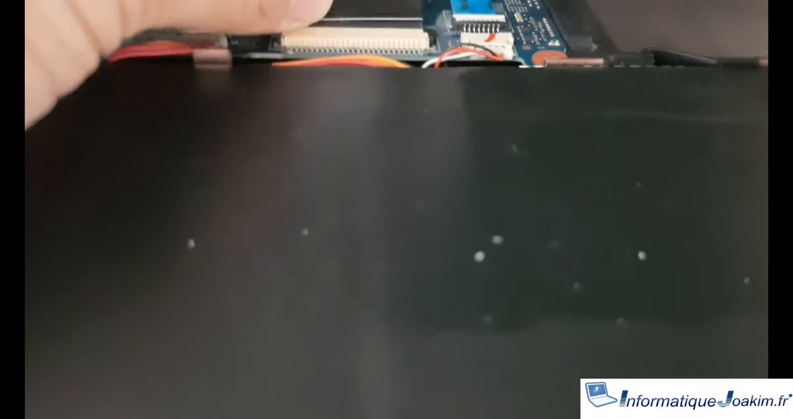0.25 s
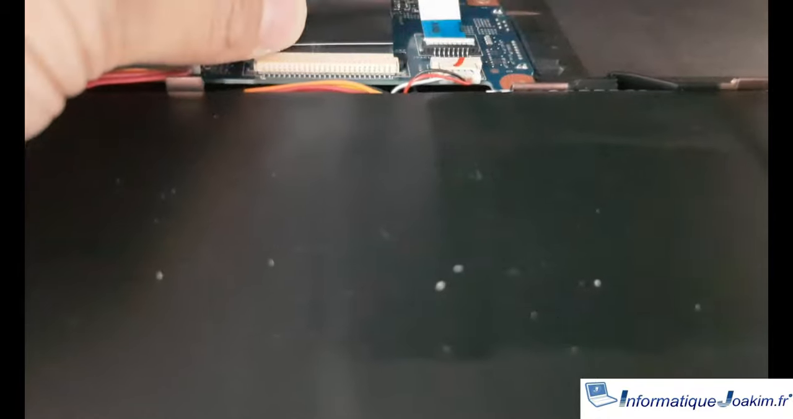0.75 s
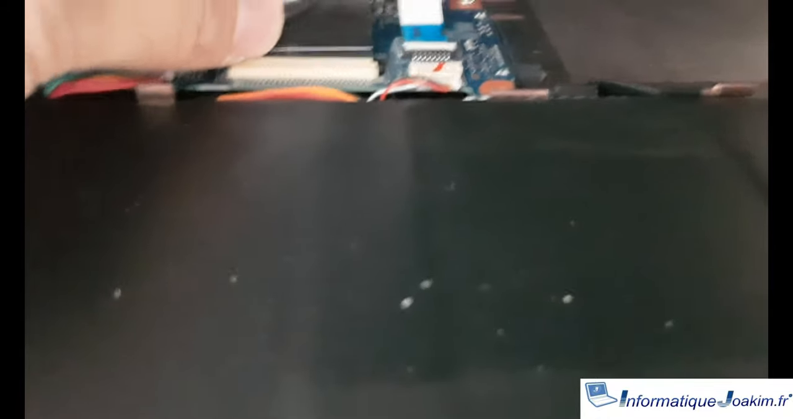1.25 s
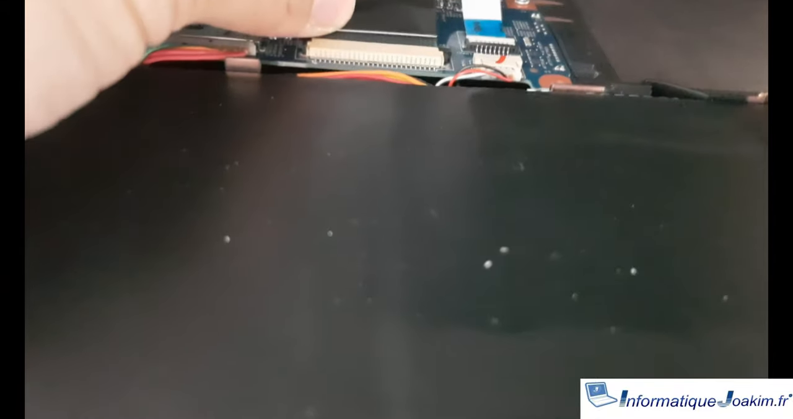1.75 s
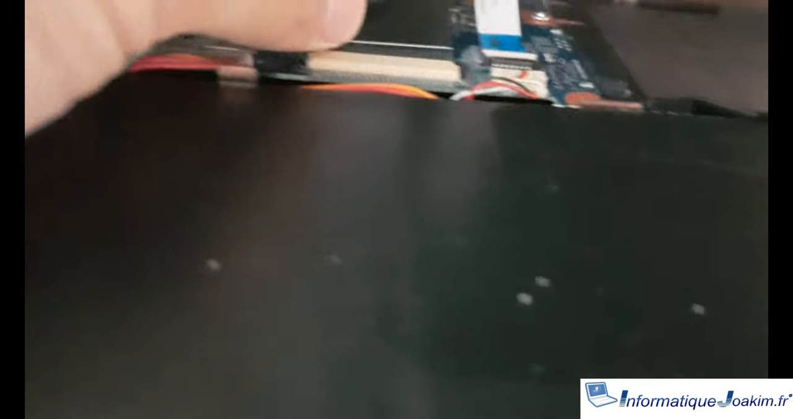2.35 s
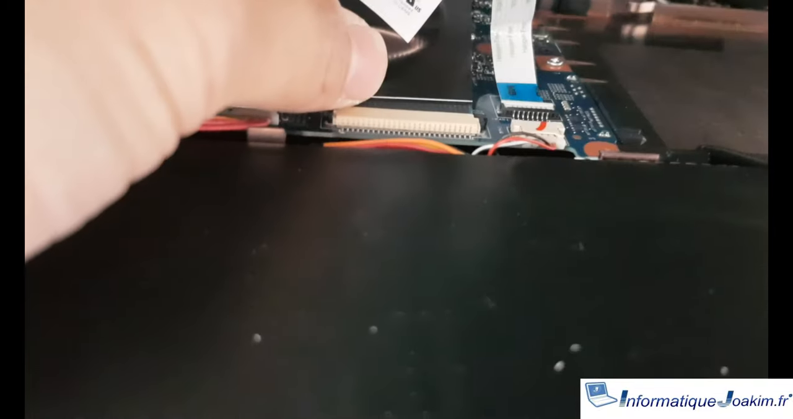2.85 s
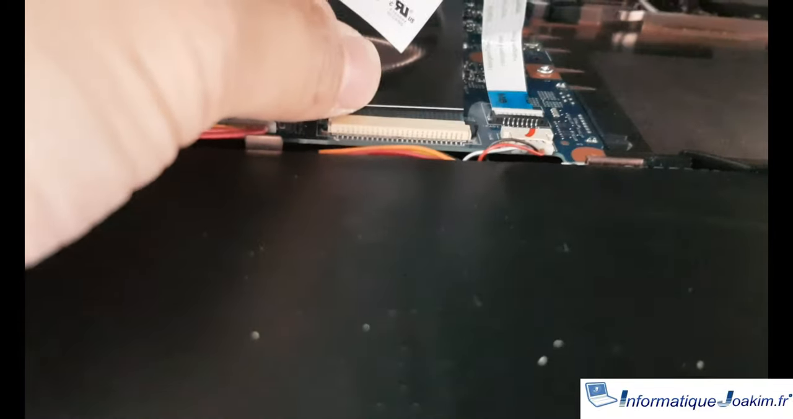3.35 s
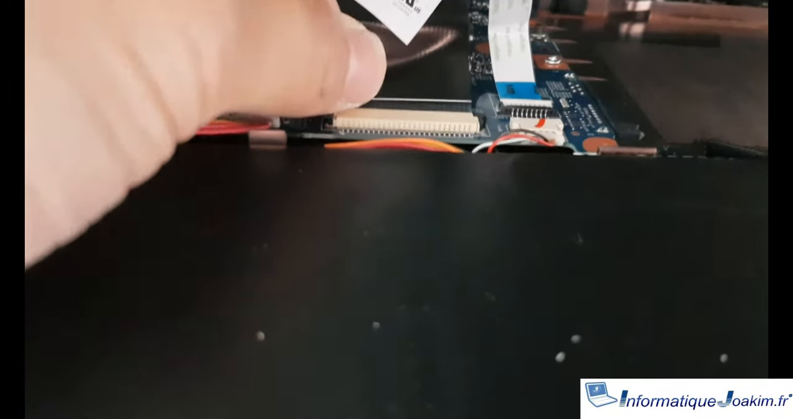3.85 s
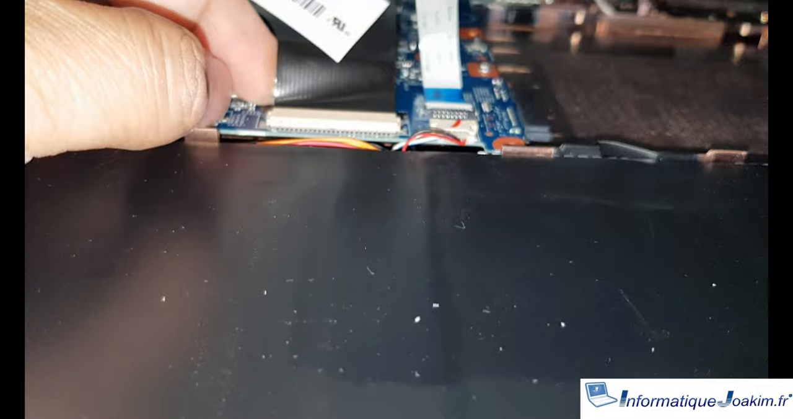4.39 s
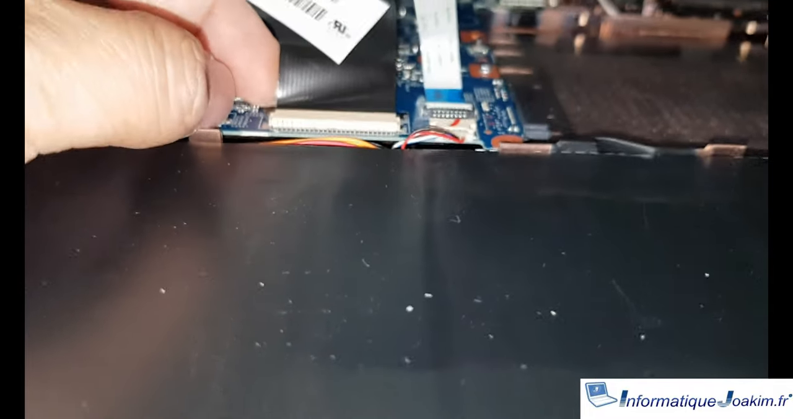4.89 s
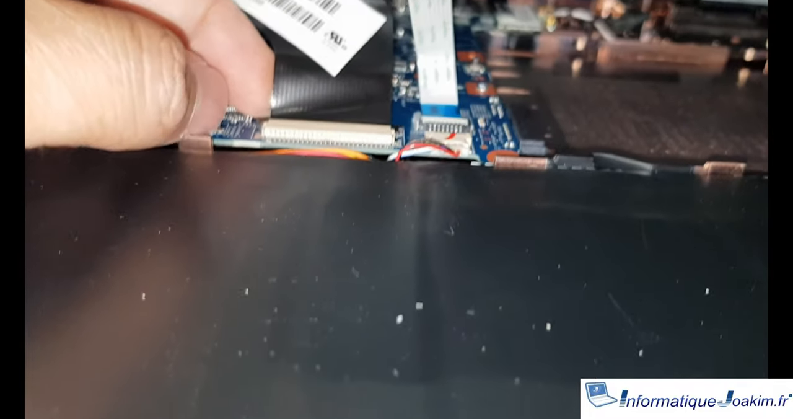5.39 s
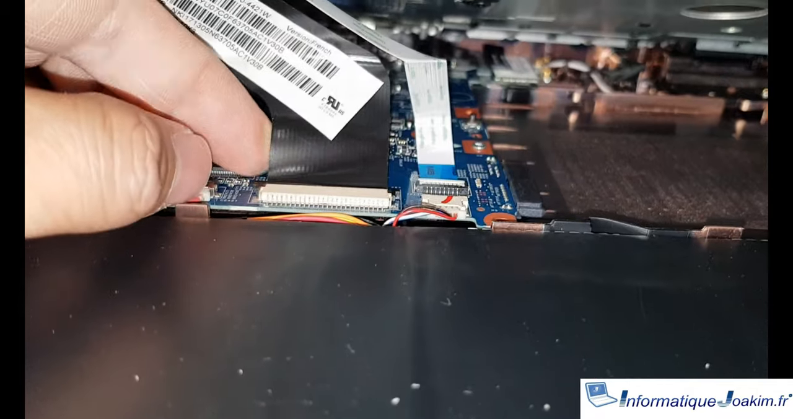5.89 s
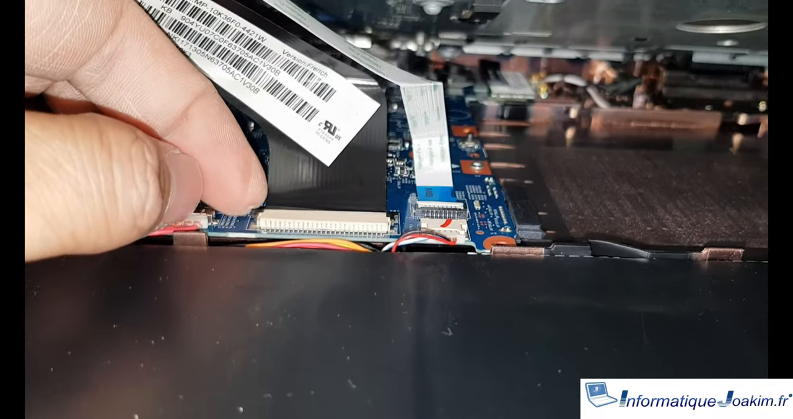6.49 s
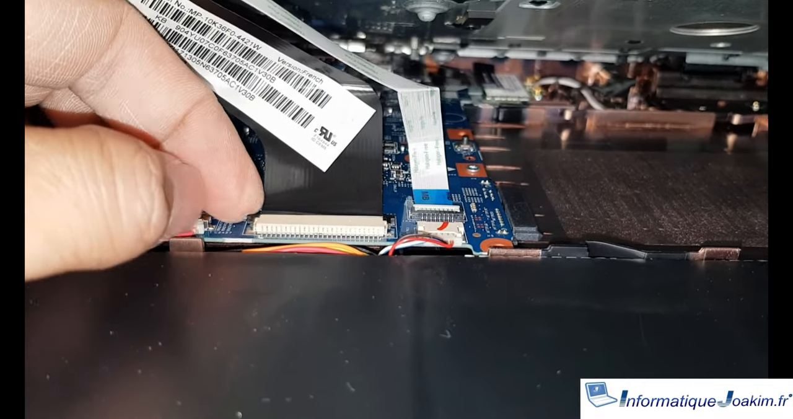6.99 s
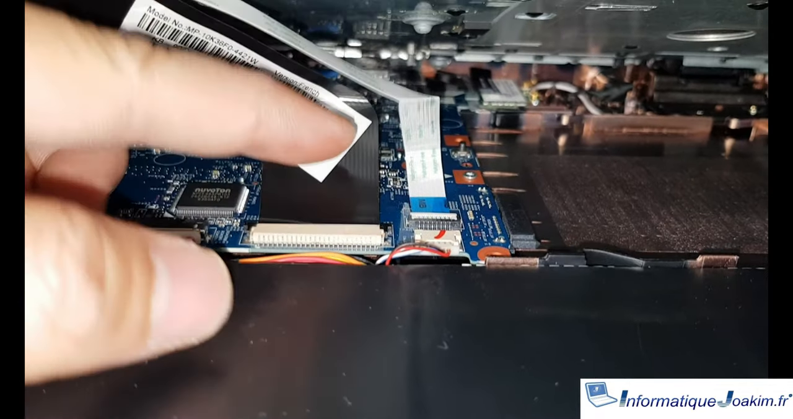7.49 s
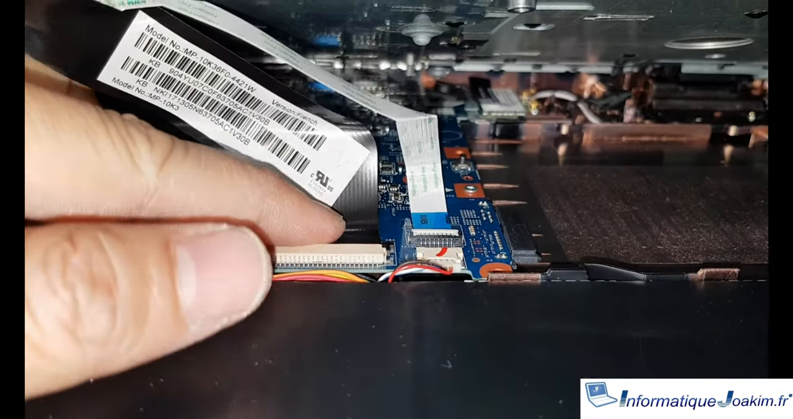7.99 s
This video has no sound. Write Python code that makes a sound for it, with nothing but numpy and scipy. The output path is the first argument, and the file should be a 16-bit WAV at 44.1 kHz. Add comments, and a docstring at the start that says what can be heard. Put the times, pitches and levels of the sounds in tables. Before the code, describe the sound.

Fingers work a ribbon cable into a laptop connector, with small plastic clicks, soft bumps and rubbing over a low room hum.

```python
"""A flat ribbon cable is worked into its connector inside an open laptop, near a hand-held stereo microphone.
Plastic parts click as they let go, the film buckles and slides, and the hand bumps the modes of the case.
Stick-slip friction of skin rubs, squeaks and scrapes; each shift of the hand makes the microphone rumble.
Behind it are a low room hum and two spells of hiss on the right. Halfway the sound drops out for an
instant and comes back with the second, louder spell."""
import sys
import numpy as np
from scipy import signal
from scipy.fft import rfft, irfft
from scipy.io import wavfile
from scipy.ndimage import uniform_filter1d

SR = 44100
rng = np.random.default_rng(int(sys.argv[2]) if len(sys.argv) > 2 else 0)


def dump(signal):
    """Clip the signal to [-1, 1] and save it as 16-bit WAV at the path in sys.argv[1]."""
    limited = np.clip(np.atleast_2d(signal).T, -1, 1)
    pcm = np.round(limited * 32767).astype(np.int16)
    wavfile.write(sys.argv[1], SR, pcm)


N = 363384
TIME = np.arange(N) / SR
RING_TIME = np.arange(SR // 6) / SR   # the span over which one contact rings
BIN_HZ = np.fft.rfftfreq(N, 1 / SR)


def from_db(db):
    """Amplitude grows tenfold for every 20 dB."""
    return 10 ** (np.asarray(db) / 20)


def unit_rms(x):
    """Power normalisation: rms 1."""
    return x / np.sqrt(np.mean(x ** 2) + 1e-20)


def unit_energy(x):
    """Energy normalisation: each channel carries as much as 10 ms at rms 1."""
    return x / np.sqrt(np.sum(x ** 2, axis=-1, keepdims=True) / (SR / 100) + 1e-20)


def pan(balance_db):
    """Level difference gives direction; balance is left minus right."""
    return from_db([[balance_db / 2], [-balance_db / 2]])


def delay(x, left_s, right_s):
    """Propagation delay: each side arrives after its own travel time."""
    return np.array([np.roll(side, int(round(s * SR))) for side, s in zip(x, (left_s, right_s))])


def add(out, start_s, sound):
    """Superposition: a stereo sound joins the mix at its start time."""
    i = int(round(start_s * SR))
    out[:, i:i + sound.shape[1]] += sound[:, :N - i]


def per_bin(curve):
    """Interpolation over log frequency gives a curve's value at every bin."""
    hz, values = np.transpose(curve)
    return np.interp(np.log(BIN_HZ + 1), np.log(hz), values)


def colour(noise, spectrum):
    """Spectral shaping: noise takes on the given spectrum, at rms 1."""
    return unit_rms(irfft(rfft(noise) * from_db(per_bin(spectrum)), N))


def roll_off(x, kind, hz, order=2):
    """A maximally flat "low" or "high" pass falls 6 dB per octave and order beyond its corner."""
    return signal.sosfilt(signal.butter(order, hz, kind, fs=SR, output="sos"), x)


def resonate(x, *bands):
    """Forced resonance: x drives two-pole resonators in series, each (frequency [Hz], bandwidth [Hz])."""
    for hz, width_hz in bands:
        r = np.exp(-np.pi * width_hz / SR)
        x = signal.lfilter([1, 0, -1], [1, -2 * r * np.cos(2 * np.pi * hz / SR), r * r], x + 1e-18)
    return x


def mode(hz, t60, delay_s):
    """Free vibration: a struck mode is a sine that decays by 60 dB in t60 seconds."""
    t = np.maximum(RING_TIME - delay_s, 0)
    return np.sin(2 * np.pi * hz * t) * from_db(-60 * t / t60)


def drift(rate_hz):
    """Random modulation: straight lines join normally distributed values."""
    knots = rng.standard_normal(N // 20)
    return np.interp(TIME * rate_hz, np.arange(len(knots)), knots)


def slips(lead_s, t60, share):
    """Stress release: small slips build to one unit impulse and die away, unlike on the two sides."""
    swell_db = np.where(RING_TIME < lead_s, -25 * (1 - RING_TIME / lead_s),
                        -60 * (RING_TIME - lead_s) / t60)
    force = rng.standard_normal((2, len(RING_TIME))) ** 3 * from_db(swell_db)
    force *= share / np.sqrt(np.sum(force ** 2, axis=1, keepdims=True))
    force[:, int(lead_s * SR)] += 1
    return force


# spectra of the room air on each side: (frequency [Hz], relative density [dB])
AIR_LEFT = [(40, -25.5), (70, -7.5), (120, 3.5), (300, -5), (420, -6.5), (850, -8.5), (1150, -17),
            (1600, -15.5), (2800, -32.5), (4000, -46), (6500, -45), (8000, -54), (13000, -41),
            (16000, -50.5)]
AIR_RIGHT = [(40, -5), (70, -10), (120, 8), (300, -4.5), (420, 0.5), (660, -12.5), (900, -5), (1650, -16),
             (2700, -24.5), (4800, -38.5), (6650, -35), (7600, -57.5), (13000, -36.5), (16000, -40)]
# likeness of the air on the two sides: (frequency [Hz], coherence [0..1])
AIR_COHERENCE = [(30, 0.7), (130, 0.9), (300, 1), (640, 0.56), (1400, 0.18), (15000, 0.18)]
# course of the air's loudness: (time [s], level [dB])
AIR_LEVEL = [(0, -48.5), (3.6, -49.5), (5.0, -51), (6.8, -52.5), (7.4, -49), (8.24, -49.5)]
# lines of the hum: (frequency [Hz], bandwidth [Hz], level [dB])
HUM_LINES = [(89.8, 1.1, -58.5), (120.1, 1.5, -59), (211.7, 6.6, -55), (265, 14, -58), (308.7, 2.9, -56),
             (907.4, 12, -66.5)]

def room_air():
    """Coherence: a dull rush is alike on both sides in the bass; narrow noise bands waver as a hum."""
    coherence = np.clip(per_bin(AIR_COHERENCE), 0, 1)
    mid, side = irfft(rfft(rng.standard_normal((2, N))) * np.sqrt([1 + coherence, 1 - coherence]), N)
    rush = np.array([colour(mid + side, AIR_LEFT), colour(mid - side, AIR_RIGHT)])
    hum = sum(from_db(db) * unit_rms(resonate(rng.standard_normal(N + SR), (hz, width))[SR:])
              for hz, width, db in HUM_LINES)
    rush_db = np.interp(TIME, *np.transpose(AIR_LEVEL))
    return from_db(rush_db) * rush + roll_off(hum, "low", 2510)


# spectra of the hiss and the duller rush on the right: (frequency [Hz], relative density [dB])
SIDE_HISS_SPECTRUM = [(900, -0.5), (2000, -5.5), (3000, 5), (4200, -2.5), (5800, -1), (8200, -14.5),
                      (9500, -8.5), (10500, -16.5), (11100, -8), (11700, -18.5), (16000, -43)]
SIDE_RUSH_SPECTRUM = [(800, -28), (1300, -33), (1800, 1), (2700, -5), (3500, -33), (6000, -21), (7500, -37)]
# spells of that hiss: (start [s], end [s], level [dB])
HISS_SPELLS = [(1.186, 3.3, -70), (4.376, 6.638, -52.5)]
DROPOUT_START_S, DROPOUT_END_S = 4.326, 4.384

def side_hiss(onset_db=-9, swell_s=0.86, rush_db=-61.5):
    """Gated noise on the right: a hiss swells and stops dead; a duller rush stays after the dropout."""
    gate = np.zeros(N)
    for start, end, db in HISS_SPELLS:
        swell_db = onset_db * np.clip(1 - (TIME - start) / swell_s, 0, 1)
        gate += ((TIME > start) & (TIME < end)) * from_db(db + swell_db)
    hiss = from_db([[-37], [0]]) * colour(rng.standard_normal((2, N)), SIDE_HISS_SPECTRUM)
    rush = from_db([[-28.5], [0]]) * colour(rng.standard_normal((2, N)), SIDE_RUSH_SPECTRUM)
    return gate * hiss + (TIME > DROPOUT_END_S) * from_db(rush_db) * rush


# spectrum of the shaken microphone: (frequency [Hz], relative density [dB])
RUMBLE_SPECTRUM = [(12, -46.5), (25, -20), (47, 7.5), (65, 11), (110, -11), (250, -45), (1000, -79)]
# shifts of the hand: (middle [s], duration [s], level [dB])
HAND_SHIFTS = [(1.3, 0.29, -48), (1.614, 0.26, -50), (2.09, 0.34, -49.5), (2.748, 1.3, -51.5),
               (4.745, 1.13, -48), (5.8, 2.4, -59.5), (7.29, 0.63, -50.5)]

def hand_rumble(resting_db=-69):
    """Structure-borne noise: each shift of the hand shakes the microphone, much alike on both sides."""
    swells = sum(from_db(db) * np.cos(np.pi * np.clip((TIME - middle) / length, -.5, .5)) ** 2
                 for middle, length, db in HAND_SHIFTS)
    shake = rng.standard_normal(N) + 0.32 * rng.standard_normal((2, N))
    return (from_db(resting_db) + swells) * pan(-2) * colour(shake, RUMBLE_SPECTRUM)


# spectra of the four layers of skin friction: (frequency [Hz], relative density [dB])
DRAG_SPECTRUM = [(50, -32), (120, 6.5), (400, -1.5), (680, -6), (1000, -7.5), (1800, -18.5), (4000, -39)]
RASP_SPECTRUM = [(700, 4.5), (1500, 5.5), (2600, 9), (3600, -0.5), (5500, -0.5), (8000, -33), (11500, -28),
                 (16000, -29)]
HISS_SPECTRUM = [(2500, -16), (5200, -6.5), (8000, -12), (10000, -7.5), (11900, -5.5), (14000, -11),
                 (16000, -22)]
SHEEN_SPECTRUM = [(7000, -23), (10000, -8), (12000, -1), (14000, -7), (16000, -9)]
# strokes on cable and case: (start [s], duration [s], rasp level [dB], brightness [dB], balance [dB])
SKIN_STROKES = [(0.015, 0.22, -69, -5.5, -10), (0.842, 0.085, -63.5, -2, 9), (0.952, 0.14, -59.5, -5, 2.5),
                (1.353, 0.023, -58, 1.5, -7), (1.5, 0.11, -80, 12.5, -9), (2.04, 0.063, -58, -6.5, 1),
                (2.109, 0.022, -70, 16.5, -7), (2.145, 0.24, -81.5, 13.5, -7), (2.543, 0.053, -54.5, -2, 8),
                (4.343, 0.49, -61, -8.5, -0.5), (4.69, 0.11, -44.5, 0, 2), (4.85, 0.24, -61.5, -5.5, 3),
                (4.99, 0.013, -43, -1.5, -12.5), (5.923, 0.019, -49.5, 3, 2), (6.999, 0.056, -58.5, -3, 0),
                (7.098, 0.25, -58.5, 6.5, -0.5), (7.27, 0.068, -72, 15.5, 2), (7.419, 0.047, -57, 0, -1),
                (7.497, 0.086, -61, 5, -3), (7.617, 0.099, -64.5, 9.5, 1), (8.156, 0.052, -63, 9.5, -1)]

def rubbing(grain_db=2.0, unevenness_db=2.5, fade_s=0.036):
    """Sliding friction: tiny slips merge into noise; lighter strokes trade drag for hiss and sheen."""
    spectra = DRAG_SPECTRUM, RASP_SPECTRUM, HISS_SPECTRUM, SHEEN_SPECTRUM
    gains = np.zeros((len(spectra), 2, N))
    for start, length, db, bright_db, balance_db in SKIN_STROKES:
        end = start + length
        span = slice(max(int((start - fade_s / 2) * SR), 0), int((end + fade_s / 2) * SR))
        from_middle = np.clip((TIME[span] - (start + end) / 2) / (length + fade_s), -.5, .5)
        pressure = np.cos(np.pi * from_middle) * np.sqrt(2 * length / (length + fade_s))   # press, lift
        drag_db, hiss_db, sheen_db = 4 - bright_db, -7.5 + bright_db, -22 + 2.12 * bright_db
        layers = from_db(db) * from_db([drag_db, 0, hiss_db, sheen_db])
        gains[:, :, span] += layers[:, None, None] * pan(balance_db) * pressure
    grip = from_db(grain_db * drift(900) + unevenness_db * drift(70))
    return sum(gain * colour(grip * rng.standard_normal((2, N)), spectrum)
               for gain, spectrum in zip(gains, spectra))


# fingertip squeaks: (start [s], duration [s], first pitch [Hz], level [dB], bandwidth [share of pitch])
FINGER_SQUEAKS = [(1.94, 0.14, 5470, -70, 0.29), (2.038, .025, 9950, -70, .08),
                  (6.985, 0.052, 3530, -61, 0.2), (7.102, 0.044, 3380, -53.5, 0.38),
                  (7.137, .024, 3100, -51.5, 0.037), (7.434, 0.051, 1640, -53, 0.45)]

def squeaks(sag_octaves_per_s=6.1):
    """Stick-slip oscillation: a fingertip sings a rough, wavering tone that sinks as the finger slows."""
    out = np.zeros((2, N))
    for start, length, first_hz, db, width_share in FINGER_SQUEAKS:
        hz = first_hz * 2 ** (-sag_octaves_per_s * TIME[:int(length * SR)])
        carrier = np.exp(2j * np.pi * np.cumsum(hz) / SR)
        noise = rng.standard_normal((2, SR // 2)) + 1j * rng.standard_normal((2, SR // 2))
        waver = roll_off(noise, "low", first_hz * width_share / 2)[:, -len(hz):]
        tone = np.real(waver * carrier) * signal.windows.tukey(len(hz), .5)
        add(out, start, from_db(db) * pan(-4.5) * unit_rms(tone))
    return out


# resonances of a plastic edge: (frequency [Hz], bandwidth [Hz], relative level [dB])
EDGE_MODES = [(2320, 720, -2), (3850, 700, -7)]
# scrapes over that edge: (start [s], duration [s], edge level [dB], hollow level [dB])
EDGE_SCRAPES = [(1.239, 0.014, -58, -48), (1.292, 0.028, -50.5, -36), (1.568, 0.0076, -54, -45),
                (1.594, 0.0058, -55, -46.5), (1.607, 0.025, -53.5, -48)]

def scrapes(hollow_hz=674):
    """Forced vibration: the slips of a juddering fingertip ring an edge and the hollow case under it."""
    out = np.zeros((2, N))
    for start, length, edge_db, hollow_db in EDGE_SCRAPES:
        arch = np.maximum(np.sin(np.pi * np.minimum(RING_TIME / length, 1)), 0)
        grit = rng.standard_normal((2, len(RING_TIME))) ** 3 * np.sqrt(arch)
        edge = sum(from_db(db) * unit_energy(resonate(grit, (hz, width))) for hz, width, db in EDGE_MODES)
        edge = roll_off(edge, "low", 3700, order=6)
        hollow = unit_energy(resonate(grit, (hollow_hz, 61), (hollow_hz, 900)))
        add(out, start, from_db(edge_db) * pan(-7) * edge + from_db(hollow_db) * pan(4.7) * hollow)
    return out


# upper modes of the case: (frequency [Hz], left gain [dB], right gain [dB], t60 [s])
CASE_MODES = [(284, -14.5, -7, 0.033), (388, -12, -44, 0.029), (653, -10.5, -14.5, 0.017),
              (880, -11.5, -30.5, 0.0082), (1130, -31.5, -44, 0.011), (1360, -36.5, -19.5, 0.015)]
# soft bumps of the hand: (time [s], level [dB], balance [dB], body pitch [Hz], hardness [dB/octave])
HAND_BUMPS = [(1.2424, -32.5, 4, 89, 4.5), (1.307, -32, 6, 84, -7), (1.618, -33.5, -2, 93, 7.5),
              (2.4119, -25.5, 9, 152, 0.5), (2.544, -28.5, 8, 110, -3), (2.6762, -14.5, 5.5, 147, 1),
              (2.833, -16, 9.5, 162, 0), (2.9325, -20.5, 6, 184, 2.5), (3.0202, -19.5, 7, 177, 2.5),
              (3.109, -18.5, 7, 175, 3.5), (3.1636, -19.5, 11, 155, 1), (3.2364, -21.5, 9.5, 126, -1),
              (4.5746, -20, 12, 190, -14.5), (4.7462, -6.5, 2.5, 145, 2), (4.8059, -6.5, 2, 148, 2.5),
              (4.8798, -7.5, -4.5, 142, 3.5), (4.996, -9.5, -4.5, 143, 4), (7.018, -33, -10, 190, 0),
              (7.17, -31.5, -7, 172, -6), (7.2209, -29, -8, 184, -4), (7.282, -31.5, -6, 173, -8),
              (7.36, -26.5, -5.5, 190, -7)]

def bumps(spread_db=1, skin_top_hz=1900, scuff_db=-29.5, scuff_s=0.017, landing_s=0.00084):
    """Modal response: the case's upper modes answer a push first, then its body swings against them."""
    out = np.zeros((2, N))
    # skin scuffs while it touches, hardest as it lands
    touch = np.exp(-(RING_TIME / scuff_s) ** 4) + 2 * np.exp(-RING_TIME / landing_s)
    for time, db, balance_db, body_hz, hardness in HAND_BUMPS:
        upper = np.zeros((2, len(RING_TIME)))
        for hz, left_db, right_db, t60 in CASE_MODES:
            drive_db = hardness * np.log2(hz / CASE_MODES[0][0]) + spread_db * rng.standard_normal()
            upper += from_db([[left_db], [right_db]]) * from_db(drive_db) * mode(hz, t60, delay_s=0)
        body = mode(body_hz, t60=0.039 * (146 / body_hz) ** 2.1, delay_s=0.00099)   # higher dies sooner
        thump = roll_off(body - upper, "low", skin_top_hz)   # soft skin excites little treble
        friction = rng.standard_normal((2, len(RING_TIME))) * touch
        scuff = unit_energy(resonate(friction, (800, 770)))
        scuff += from_db(-17.5) * unit_energy(resonate(friction, (8200, 4600)))
        add(out, time, from_db(db) * pan(balance_db) * (thump + from_db(scuff_db) * scuff))
    return out


# modes of the plastic panel: (frequency [Hz], relative level [dB], t60 [s])
PANEL_MODES = [(1560, 0.5, 0.0081), (3270, -8.5, 0.003)]
# clicks: (time [s], thud level [dB], knock level [dB], knock pitch [Hz], snap level [dB], snap pitch [Hz],
# snap bandwidth [share of pitch], panel relative to snap [dB], slips [share of release], balance [dB])
PLASTIC_CLICKS = [(2.2, -45, -48, 580, -55.5, 1550, 0.42, -17, 0.47, 15),
                  (2.29, -43, -53.5, 560, -64.5, 1480, 1, 1, 1, 18),
                  (2.4119, -47, -66, 570, -51.5, 1530, 0.43, -2, 1, 16),
                  (2.4706, -39, -40, 584, -57, 1500, 0.61, 2, 0.88, 8.5),
                  (2.531, -39, -40.5, 590, -57, 1500, 0.74, 3, 0.89, 7.5),
                  (2.5987, -36.5, -43.5, 580, -59, 1590, 0.58, -6, 1, 9),
                  (2.8034, -40, -37, 480, -30, 1650, 0.5, -5.5, 0.71, 5),
                  (4.4744, -43, -45, 567, -48, 2060, 0.37, -2, .8, -3),
                  (4.4945, -45, -41, 590, -48.5, 3320, 1.6, 1, 0.97, 0),
                  (4.516, -36.5, -39.5, 606, -44, 3430, 1.8, -2, 1, 1),
                  (4.544, -40, -38.5, 557, -42, 3070, 1, -2, 1, 0),
                  (4.574, -33, -35, 720, -31, 5100, 0.14, -12, 0.75, 7),
                  (4.893, -33, -37.5, 580, -38, 2390, 0.41, -7, .9, -11),
                  (4.9229, -39, -43, 574, -47, 2150, 0.36, -3, .9, -27.5),
                  (4.9639, -37.5, -42, 795, -49.5, 2900, 0.28, -2, 1, -21.5),
                  (5.0425, -33, -33.5, 413, -38, 2500, 0.76, -2.5, 1, -11),
                  (5.297, -38, -40, 460, -43, 2060, 0.52, -1, 0.7, -24),
                  (5.514, -35, -37.5, 590, -41.5, 2540, 0.35, 0.5, 1, -21),
                  (5.7352, -41, -40.5, 367, -41, 2280, 0.31, -10, 0.19, -20),
                  (6.638, -60, -49, 570, -51, 1840, 1.2, -11, 1, -16)]

def clicks(lead_s=0.0021, knock_cycles=7.2, tick_ceiling_db=-44):
    """Impulse response: a plastic edge lets go with a snap and tick; the part knocks, the case thuds."""
    out = np.zeros((2, N))
    thud = unit_energy(mode(85, 0.016, lead_s) - 0.63 * mode(300, 0.015, lead_s))
    panel = sum((-1) ** k * from_db(db) * unit_energy(mode(hz, t60, lead_s))
                for k, (hz, db, t60) in enumerate(PANEL_MODES))
    lip = from_db(-21) * unit_energy(mode(4840, 0.0059, lead_s))   # the connector's thin lip pings
    for (time, thud_db, knock_db, knock_hz, snap_db, snap_hz,
         width_share, panel_db, slip_share, balance_db) in PLASTIC_CLICKS:
        t60 = knock_cycles / knock_hz
        knock = unit_energy(mode(knock_hz, t60, lead_s) - 0.49 * mode(knock_hz * 1.764, t60, lead_s))
        release = slips(lead_s, t60=0.022, share=slip_share)
        snap = resonate(release, (snap_hz, snap_hz * width_share), (snap_hz * 0.5, snap_hz * 1.6))
        tick = roll_off(resonate(release, (12700, 2800), (10000, 6000)), "high", 5000)
        # louder and higher snaps carry more tick
        tick_db = min(snap_db - 17.5 + 22.5 * np.log2(snap_hz / 2320), tick_ceiling_db)
        click = from_db(thud_db) * thud + from_db(knock_db) * pan(9.9) * knock
        click += from_db(snap_db) * (unit_energy(snap) + lip + from_db(panel_db) * panel)
        click += from_db(tick_db) * pan(-18) * unit_energy(tick)
        add(out, time - lead_s, pan(balance_db) * click)
    return out


# buckles of the bending cable: (time [s], level [dB], pitch [Hz], balance [dB])
CABLE_BUCKLES = [(0.852, -49.5, 2300, 1), (0.8742, -44, 2160, 4), (0.8926, -45.5, 2020, 1),
                 (0.9, -48, 2000, 3), (0.913, -50, 2170, 7), (0.9272, -52, 2600, -1), (0.972, -49, 2020, 1),
                 (0.983, -53, 2050, 5), (0.992, -47, 2030, 5), (1.0063, -44.5, 1960, 1),
                 (1.0128, -52, 1990, 3), (1.032, -49, 2060, 1), (1.038, -57, 2040, 0),
                 (1.044, -55, 2060, -1), (1.057, -58, 2020, -4), (2.065, -54, 2160, -6),
                 (2.077, -52, 2390, -6)]

def cable_crinkles(lead_s=0.0024):
    """Buckling: the stiff film gives way in small crackles, rings, and shakes the board under it."""
    out = np.zeros((2, N))
    for time, db, hz, balance_db in CABLE_BUCKLES:
        buckle = slips(lead_s, t60=0.037, share=3.8)
        film = unit_energy(resonate(buckle, (hz, 1170), (1800, 5300)))
        ring = from_db(-4.5) * unit_energy(resonate(buckle, (hz, 83), (hz, 1400)))
        edge = from_db(-9.5) * unit_energy(resonate(buckle, (9300, 4000), (14000, 9800)))
        board = from_db(-3.5) * unit_energy(resonate(buckle, (1400, 800), (1300, 1200)))
        add(out, time - lead_s, from_db(db) * pan(balance_db) * (film + ring + edge + board))
    return out


# resonances of the sliding cable: (frequency [Hz], bandwidth [Hz], level [dB], fall [dB], balance [dB])
CABLE_MODES = [(1350, 250, -39.5, 13, -1.5), (2670, 350, -45.5, 6, 9), (3670, 900, -35.5, 16, -2.5),
               (5100, 700, -38, 16.5, 0), (11300, 4000, -43.5, 21, -2)]

def cable_slide(start_s=4.5745, length_s=0.098, release_s=0.015):
    """Friction-driven resonance: the freed cable shoots along its slot, fades as it slows, and stops."""
    out = np.zeros((2, N))
    t = TIME[:int(length_s * SR)]
    stop = np.clip((length_s - t) / release_s, 0, 1)
    for hz, width, db, fall_db, balance_db in CABLE_MODES:
        ring = unit_rms(resonate(rng.standard_normal((2, len(t))), (hz, width)))
        envelope = from_db(db - fall_db * np.sqrt(t / length_s)) * stop
        add(out, start_s, envelope * pan(balance_db) * ring)
    return out


def scene():
    """Superposition of all sources: bumps reach the right side first, the room's hum the left."""
    contacts = roll_off(delay(bumps(), left_s=0.00033, right_s=0) + clicks(), "high", 91)
    room = delay(room_air(), left_s=0, right_s=0.00021)
    handling = cable_slide() + scrapes() + cable_crinkles() + rubbing() + squeaks() + hand_rumble()
    return room + side_hiss() + handling + contacts


def record(dry, dropout_db=-44, cutoff_hz=15850):
    """Gating and band limiting: the sound drops out briefly, and a steep low-pass cuts the top."""
    muted = (TIME > DROPOUT_START_S) & (TIME < DROPOUT_END_S)
    gain = uniform_filter1d(np.where(muted, from_db(dropout_db), 1), size=40)
    return signal.sosfilt(signal.ellip(10, .1, 70, cutoff_hz, fs=SR, output="sos"), dry * gain)


dry = scene()
out = record(dry)
dump(out)
```